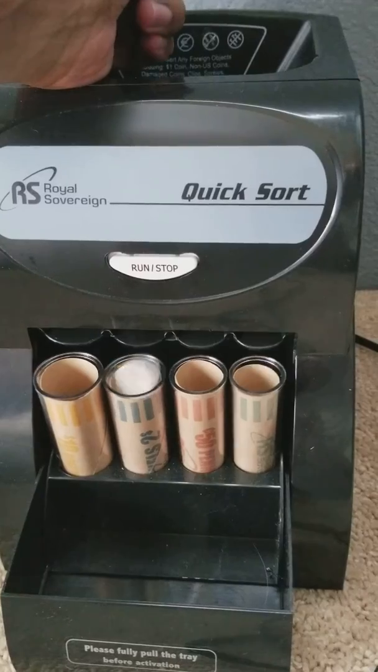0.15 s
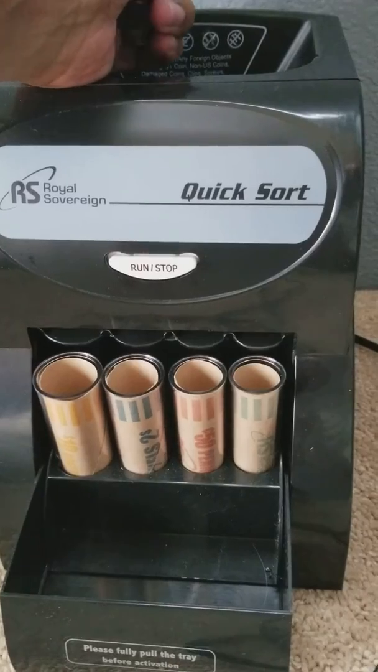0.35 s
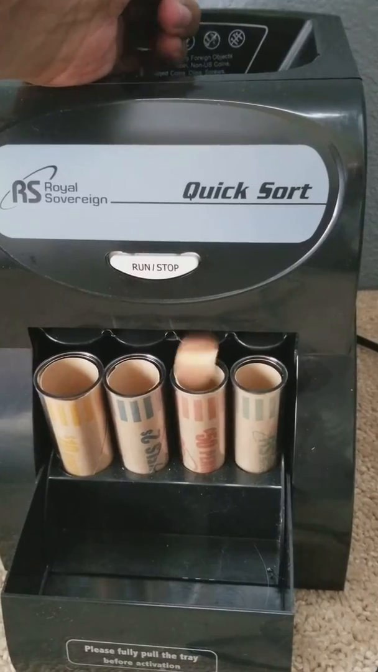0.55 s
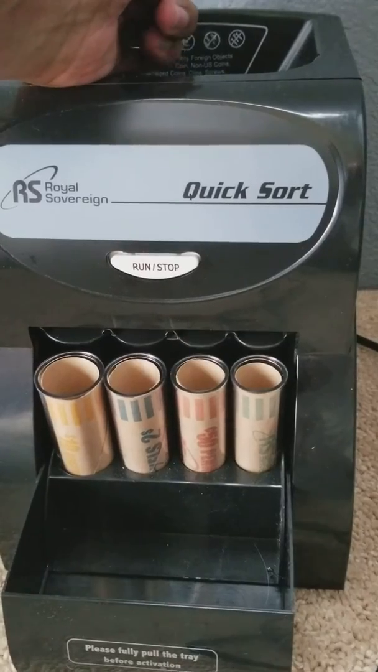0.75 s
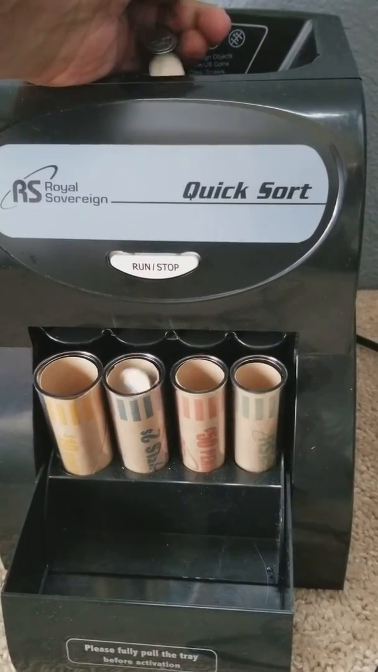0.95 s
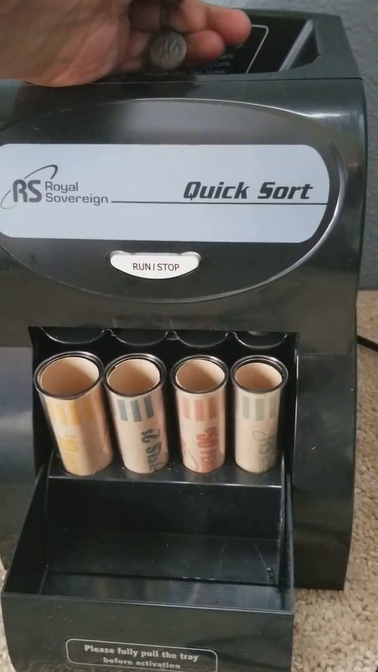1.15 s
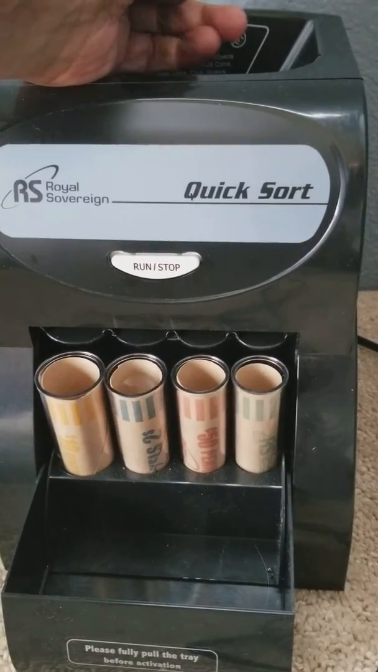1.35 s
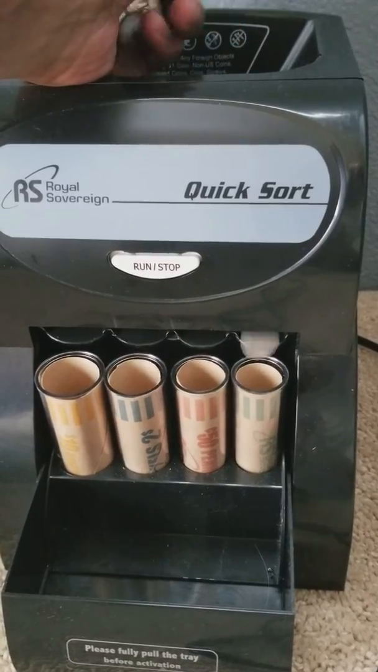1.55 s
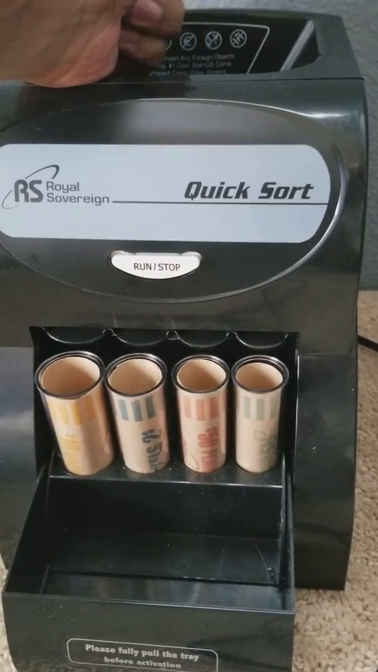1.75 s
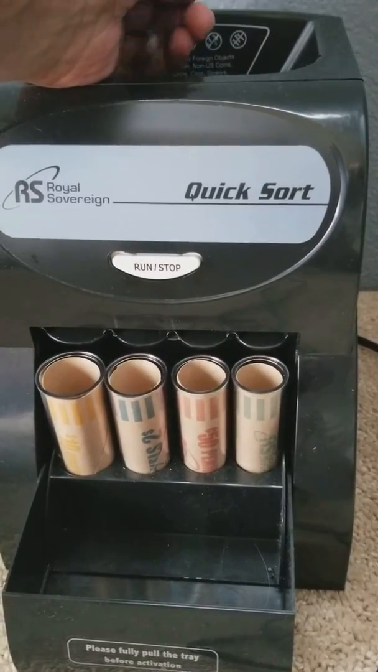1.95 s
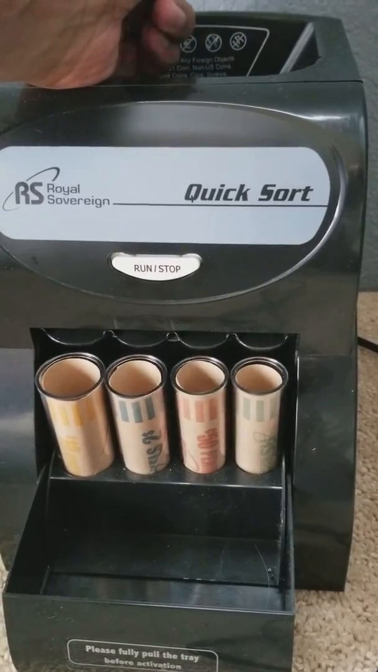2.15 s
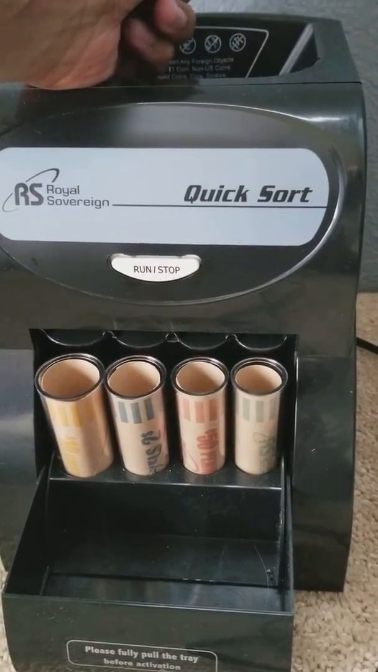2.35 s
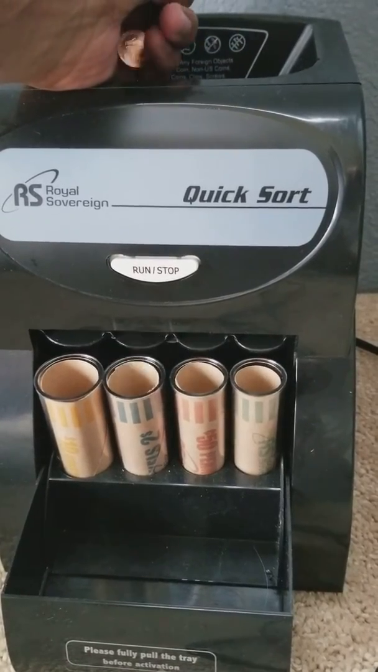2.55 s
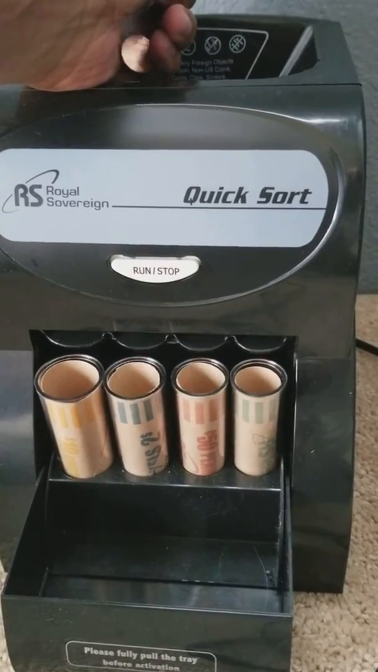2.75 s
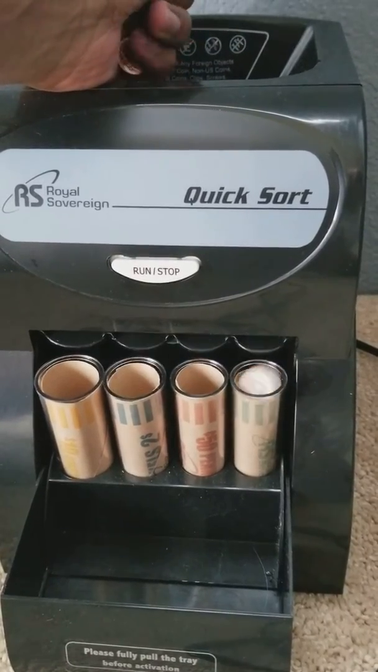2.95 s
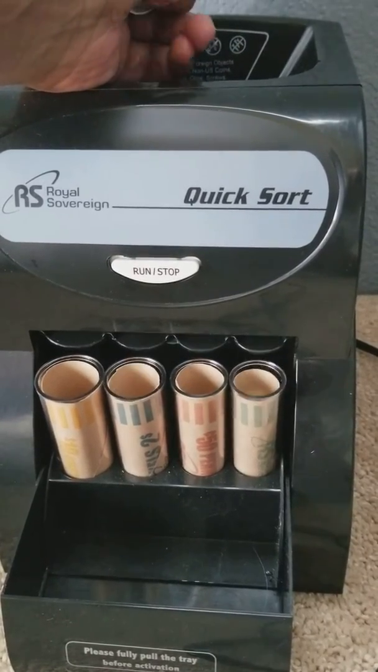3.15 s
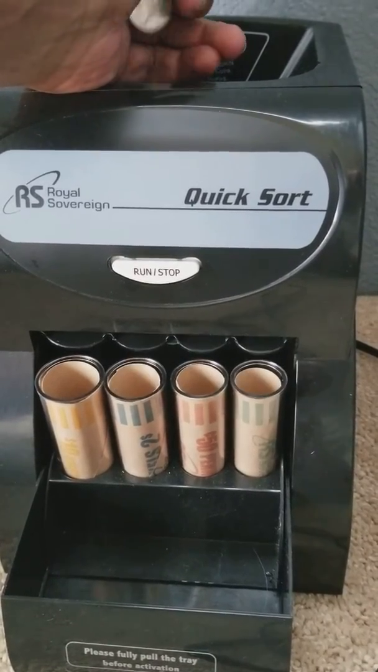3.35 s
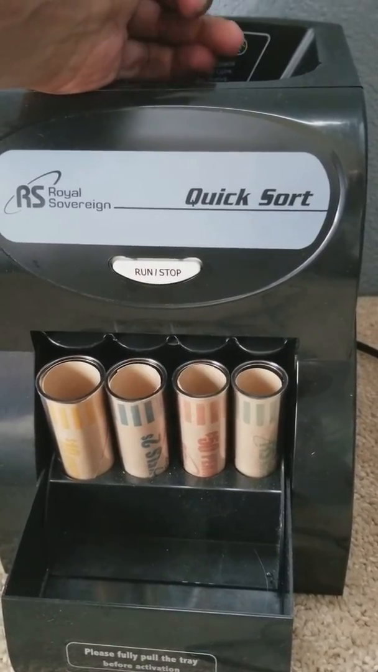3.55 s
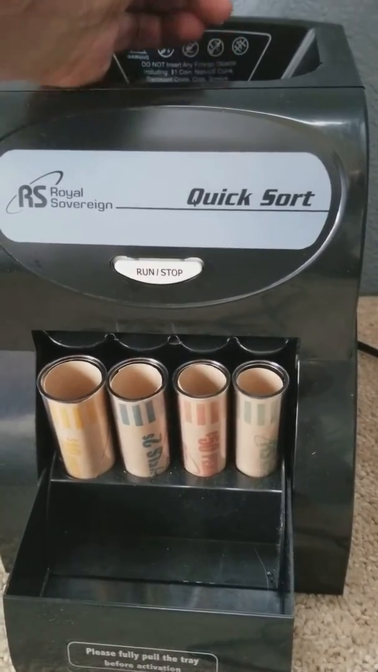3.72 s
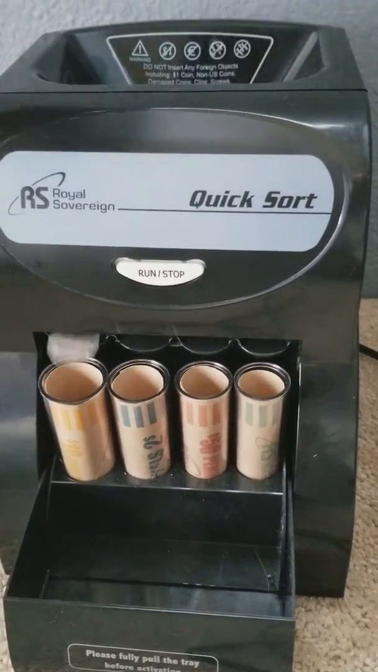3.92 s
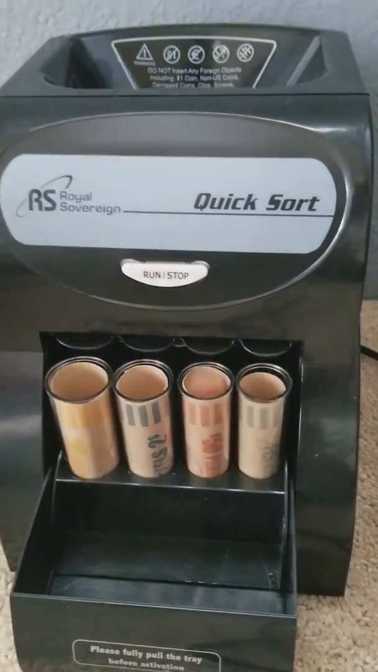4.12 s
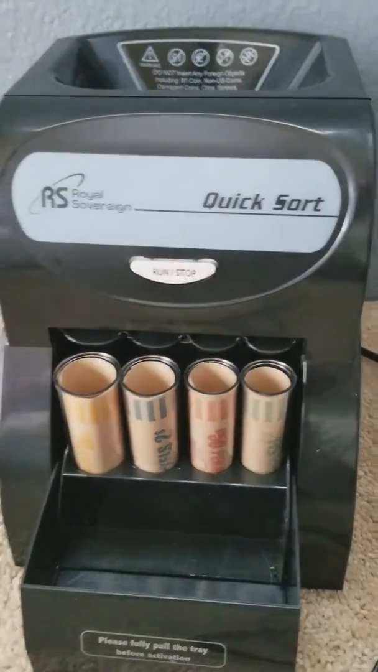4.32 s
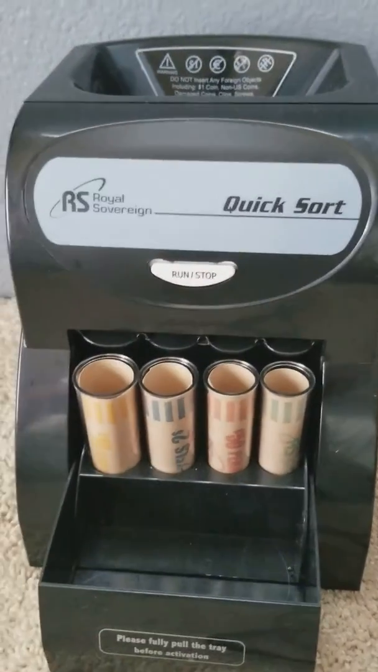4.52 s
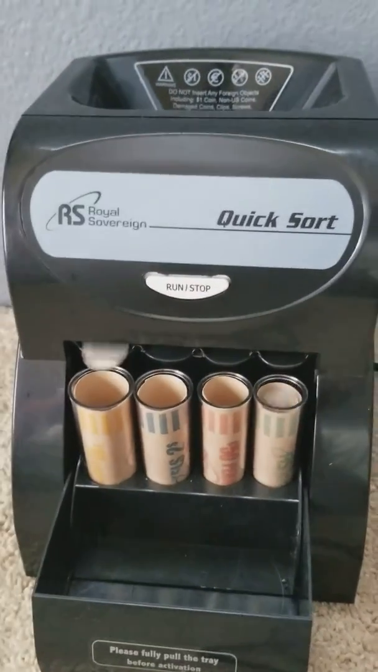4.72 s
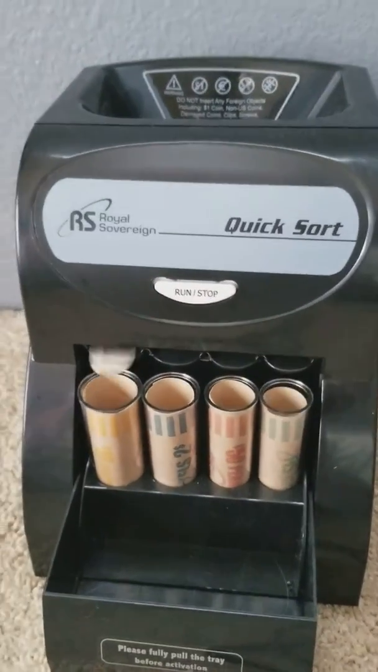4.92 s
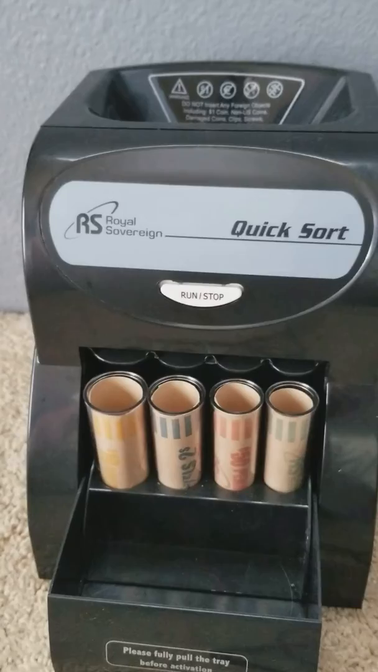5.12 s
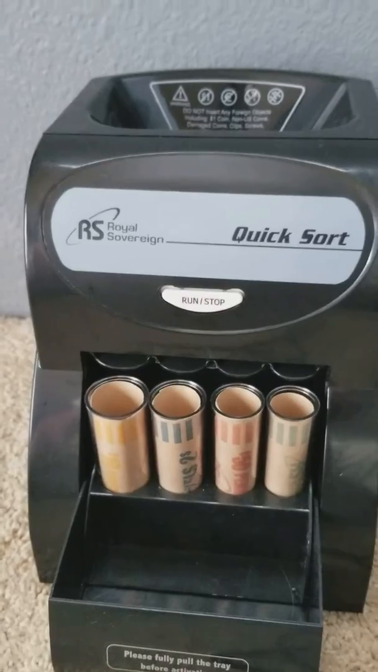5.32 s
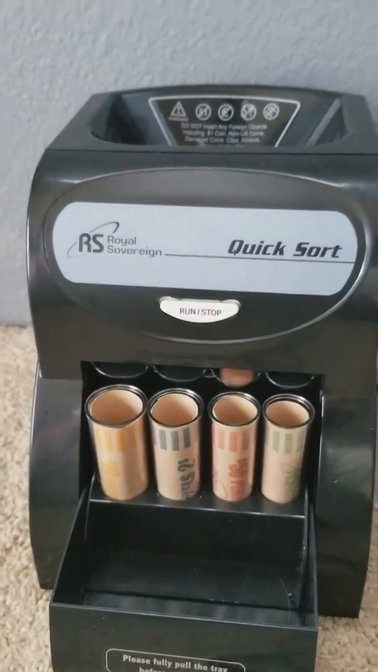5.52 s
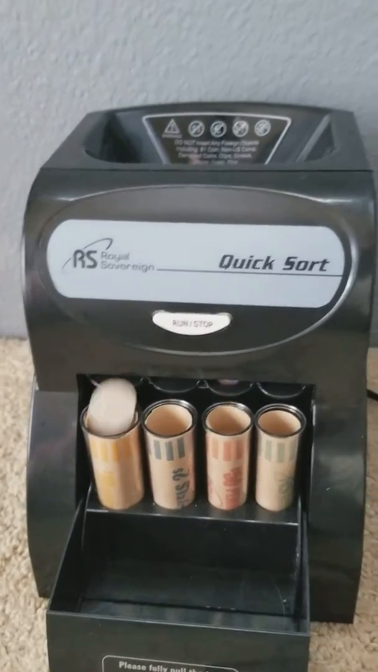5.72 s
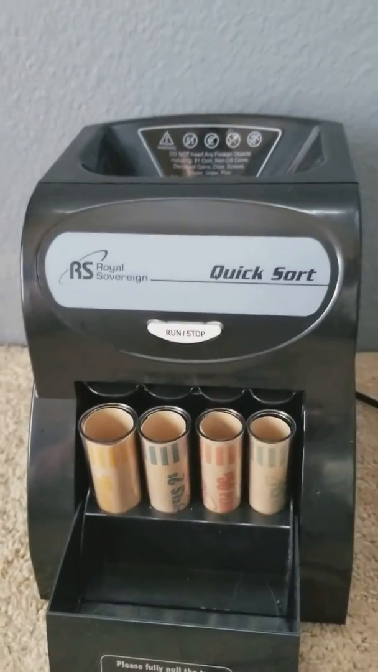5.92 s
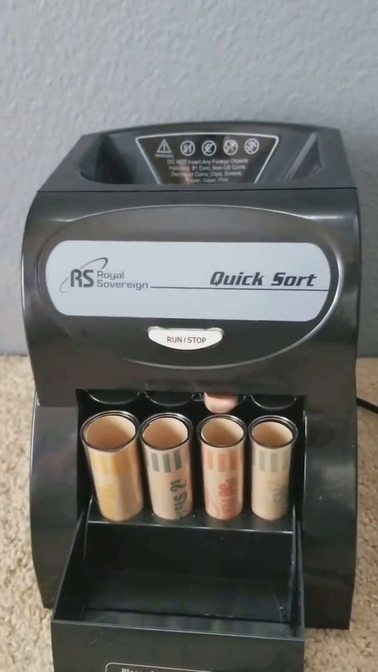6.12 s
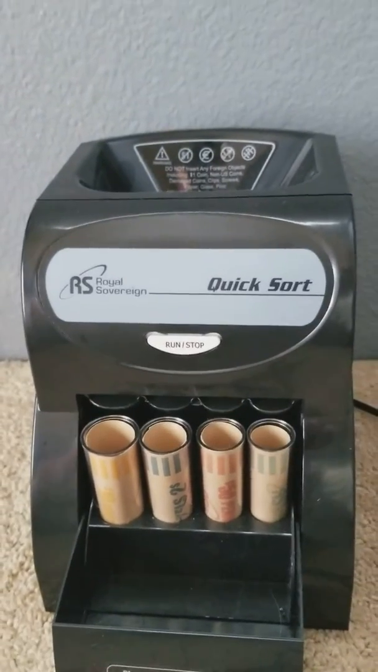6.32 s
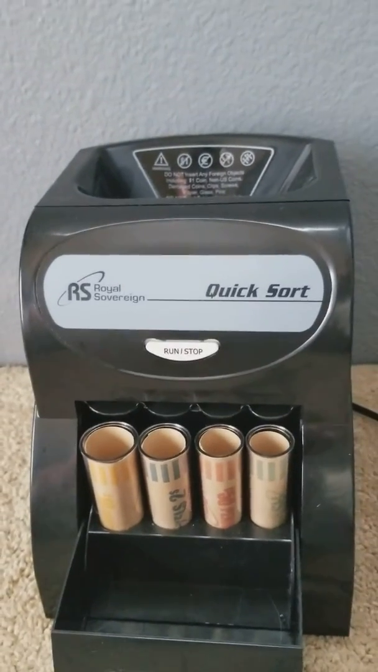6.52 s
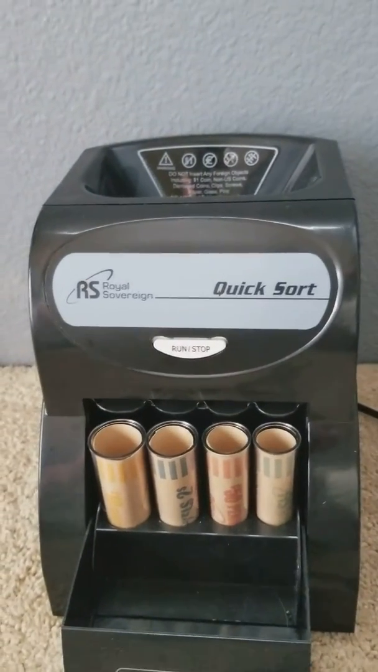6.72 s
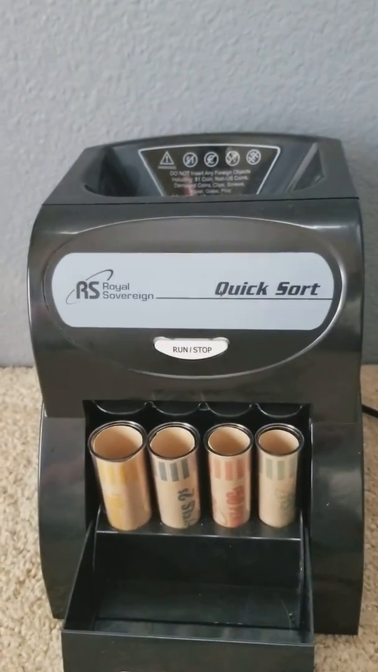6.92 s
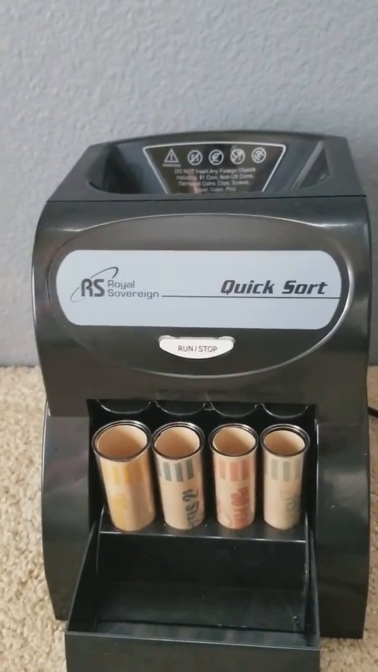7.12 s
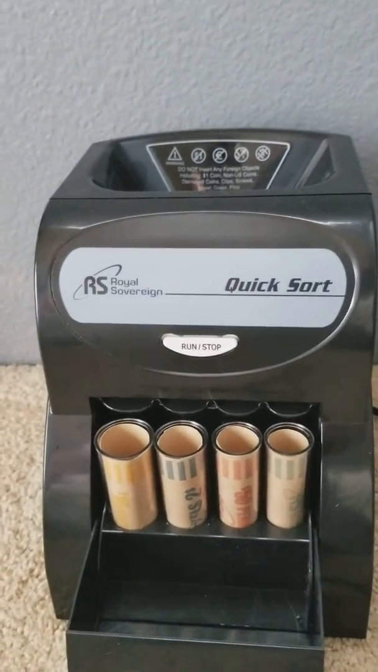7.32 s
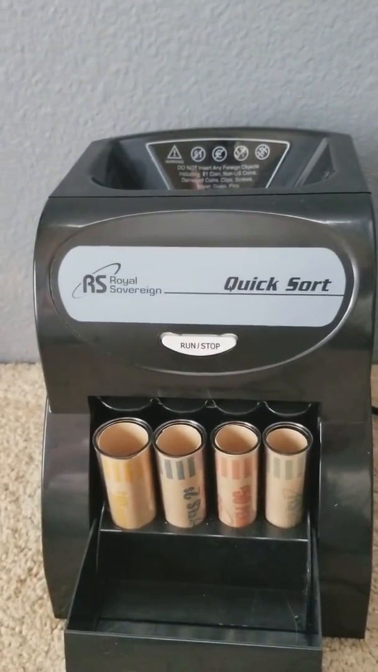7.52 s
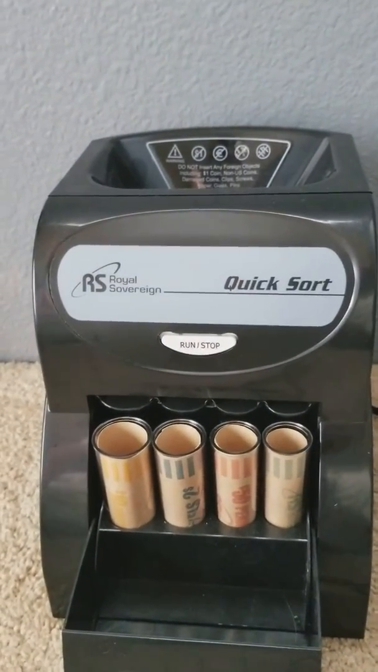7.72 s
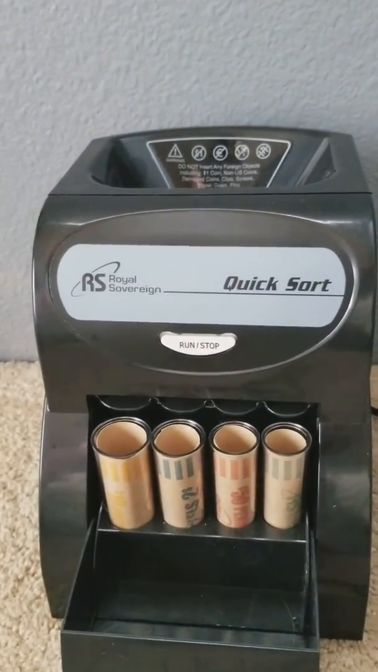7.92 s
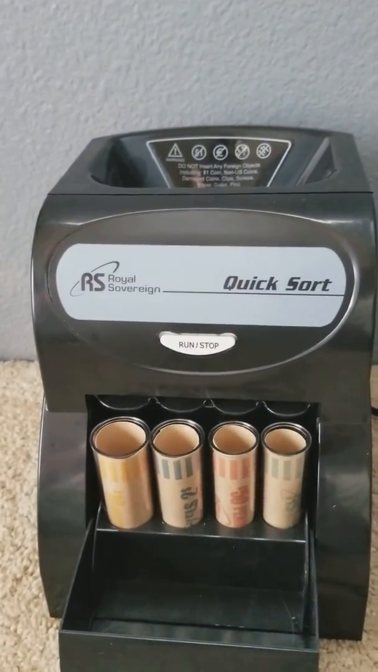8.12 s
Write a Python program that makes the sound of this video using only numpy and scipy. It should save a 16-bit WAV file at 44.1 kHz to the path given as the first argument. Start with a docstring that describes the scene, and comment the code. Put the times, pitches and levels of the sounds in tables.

```python
"""Electric coin sorter on a carpet.

Coins fall into the hopper, tumble on the turning disc and drop into paper tubes. Each contact rings
the metal and knocks the hollow plastic housing; coins in the air sing. A flap snaps once a turn.
Towards the end the coins run out, leaving the motor's hum and the rub of the bare disc."""
import sys
import numpy as np
from scipy import signal
from scipy.fft import rfft, irfft, next_fast_len
from scipy.io import wavfile
from scipy.ndimage import uniform_filter1d

SR = 44100
rng = np.random.default_rng(int(sys.argv[2]) if len(sys.argv) > 2 else 0)


def file_out(sig):
    """Save sig as 16-bit WAV at sys.argv[1]."""
    # one column per channel
    cols = np.atleast_2d(sig).T
    # limit, then scale
    lim = np.clip(cols, -1, 1)
    pcm = np.round(lim * 32767).astype(np.int16)
    wavfile.write(sys.argv[1], SR, pcm)


N = 364266
T = np.arange(N) / SR


def undb(db):
    """Decibels to gain."""
    return 10 ** (np.asarray(db) / 20)


def unit(x):
    """Scale to rms 1."""
    return x / np.sqrt(np.mean(x ** 2))


def curve(t_s, db):
    """Gain per sample from dB breakpoints."""
    return undb(np.interp(T, t_s, db))


def walk(rate_hz):
    """Smooth random drift, rms 1."""
    step = int(SR / rate_hz)
    held = np.repeat(rng.standard_normal(N // step + 1), step)
    return unit(uniform_filter1d(held, step)[:N])


def stereo_noise(lag_s, coherence):
    """White noise: a shared part, lagging on the right, plus independent parts."""
    noise = rng.standard_normal((3, N))
    shared = np.array([noise[0], np.roll(noise[0], round(lag_s * SR))])
    return np.sqrt(coherence) * shared + np.sqrt(1 - coherence) * noise[1:]


def colour(x, spectrum):
    """Filter by (f/Hz, level/dB) points; white noise keeps its rms."""
    hz, db = np.transpose(spectrum)
    size = next_fast_len(N)
    bins_hz = np.maximum(np.fft.rfftfreq(size, 1 / SR), 1)
    gain = unit(undb(np.interp(np.log(bins_hz), np.log(hz), db)))
    return irfft(rfft(x, size) * gain, size)[..., :N]


def ring(x, hz, width_hz, order=1):
    """One resonance; order 2 has steeper flanks."""
    if order == 1:
        peak = signal.iirpeak(hz, hz / width_hz, fs=SR)
        return signal.lfilter(*peak, x) * np.sqrt(SR / (np.pi * width_hz))
    band = signal.butter(order, [hz - width_hz / 2, hz + width_hz / 2], "band", fs=SR, output="sos")
    return signal.sosfilt(band, x) * np.sqrt(SR * np.sqrt(2) / (np.pi * width_hz))


def resonances(x, modes):
    """Modes of alternating polarity under one drive."""
    return sum((-1) ** k * undb(db) * ring(x, hz, width) for k, (hz, width, db, *_) in enumerate(modes))


def strikes(t_s, db, pan_db=0):
    """One stereo impulse per contact; pan is left minus right."""
    out = np.zeros((2, N))
    at = np.minimum((t_s * SR).astype(int), N - 1)
    np.add.at(out[0], at, undb(db + pan_db / 2))
    np.add.at(out[1], at, undb(db - pan_db / 2))
    return out


def envelope(hits, rise_s, t60_s):
    """Fast swell and exponential decay after each impulse."""
    up, down = np.exp(-1 / (rise_s * SR)), undb(-60 / (t60_s * SR))
    return signal.lfilter([1 - up], np.convolve([1, -up], [1, -down]), hits)


def rattle(modes, noise, t_s, db, scrape, scatter_db, t60_s, pan_db=0, order=1):
    """Contacts and wavering scrape drive each mode with noise; db is one row, or a row per mode."""
    move_s = 3.73  # the listener moves from above the hopper to face the tubes
    drive_db = db + scatter_db * rng.standard_normal((len(modes), len(t_s)))
    out = 0
    for k, (hz, width_hz, *view_db) in enumerate(modes):
        drive = envelope(strikes(t_s, drive_db[k], pan_db), 0.00044, t60_s)
        drive += scrape * undb(6.5 * walk(35))
        gain = undb(np.where(T > move_s, view_db[-1], view_db[0]))
        out += (-1) ** k * gain * ring(drive * noise, hz, width_hz, order)
    return out


# whirr spectrum: f/Hz, relative level/dB
WHIRR_SPECTRUM = [(15, -57.5), (28, -16.5), (113, -15.5), (175, -20), (235, -5), (438, -21),
                  (639, -13.5), (984, -22.5), (4120, -32), (11800, -22.5), (15900, -27.5)]
# hum: t/s, low tone level/dB, high tone level/dB
HUM_LEVELS = [(6.3, -84.5, -70.5), (6.85, -73.5, -70), (7.0, -64.5, -65), (7.14, -63, -64.5),
              (7.22, -68, -64), (7.42, -68, -63.5), (7.5, -65, -61.5), (7.72, -64, -66), (7.8, -71.5, -66)]


def motor():
    """Faint whirr and two wavering mains hum tones that grow louder near the end."""
    whirr = undb(-61.5 + 4.1 * walk(6.5)) * colour(stereo_noise(0, 0.32), WHIRR_SPECTRUM)
    t_s, low_db, high_db = np.transpose(HUM_LEVELS)
    hum = 0
    for hz, db in (120, low_db), (239.5, high_db):
        tone = np.sin(2 * np.pi * hz * T + 2.1 * walk(20))
        hum += curve(t_s, db + 2.5) * undb(4 * walk(12)) * tone
    return whirr + hum


# deep bumps: t/s, level/dB
BUMPS = [(.25, -48), (.6, -52), (2.06, -59), (3.132, -46), (6.784, -46), (6.801, -51), (7.882, -54)]


def bumps():
    """Deep one-sided pulses, DC blocked."""
    t_s, db = np.transpose(BUMPS)
    pulses = envelope(strikes(t_s, db + 6.5), 0.0012, 0.02)
    return signal.lfilter([1, -1], [1, -0.995], pulses)


# disc rubs: t/s, level/dB
RUBS = [(6.87, -63), (6.95, -74), (7.043, -48.5), (7.126, -50), (7.231, -52), (7.323, -47.5), (7.438, -53),
        (7.51, -49), (7.615, -54), (7.665, -56), (7.84, -59), (7.891, -50.5), (8.021, -55), (8.116, -57),
        (8.21, -57)]


def disc_rub(half_width_s=0.025):
    """The bare disc scuffs the housing, driving its hollow and low modes."""
    swells = sum(undb(db) * np.exp(-((T - t_s) / half_width_s) ** 2) for t_s, db in RUBS)
    return swells * unit(resonances(stereo_noise(0.00026, 0.85), HOLLOW_MODES + HOUSING_MODES[:8]))


# snaps, early or late with the load: t/s, level/dB
SNAPS = [(0.2435, -5), (0.6253, -7.5), (1.004, -5.5), (1.3788, -4), (1.768, -7), (2.154, -7), (2.536, -6),
         (2.9156, -7), (3.2978, -6.5), (3.671, -7), (4.0593, -8.5), (4.444, -8.5), (4.8263, -7),
         (5.2069, -9.5), (5.587, -7.5), (5.9603, -7), (6.349, -5), (6.7366, -6), (7.1165, -5), (7.498, -6),
         (7.878, -5), (8.2504, -3)]
# crack spectrum: f/Hz, relative level/dB
CRACK_SPECTRUM = [(590, -45.5), (1000, -18.5), (1960, -14.5), (2350, -16.5), (2950, -20), (3450, -12),
                  (5740, -11), (7410, -3), (10100, -4), (11100, 2.5), (15000, -6.5), (15900, 8)]
# flap modes: f/Hz, width/Hz, level/dB
FLAP_MODES = [(1510, 150, -12.5), (2020, 90, -5.5), (3420, 110, 1), (4400, 120, -2.5), (5140, 86, 1),
              (6390, 150, -1), (7270, 180, 2), (8400, 200, 3)]


def flap():
    """Once a turn the flap cracks, rings with a fading buzz and knocks the housing."""
    t_s, db = np.transpose(SNAPS)
    hits = strikes(t_s, db)
    burst = uniform_filter1d(hits, 150, origin=74) * 150  # each hit held 3.4 ms
    crack = envelope(burst, 0.00053, 0.023) * undb(-39 + 0.51 * walk(820))
    tail = envelope(hits, 0.0078, 0.0095) * undb(-8 + 3 * walk(150))
    snap = colour((crack + tail) * stereo_noise(-0.0001, 0.078), CRACK_SPECTRUM)
    blow = strikes(t_s + 0.002, db - 15.5)
    buzz = envelope(hits, 0.003, 0.061) * undb(-29.5 + 4.8 * walk(90)) * stereo_noise(0.0001, 0.12)
    knock = envelope(strikes(t_s, db=-23), 0.0043, 0.014) * stereo_noise(0.0003, 0.98)
    return snap + resonances(blow + buzz, FLAP_MODES) + resonances(knock, HOUSING_MODES[5:])


# airborne coin rings: t/s, f/Hz, level/dB
RINGS = [(0.03, 14000, -38), (0.27, 14000, -33), (0.348, 12403, -35), (0.6, 11570, -35), (0.94, 13824, -37),
         (1.19, 14200, -35), (1.42, 14200, -37), (1.685, 13307, -35), (1.715, 12800, -35),
         (2.32, 15331, -33), (4.31, 13350, -39), (4.9, 15546, -31), (4.905, 14944, -36), (4.93, 12100, -35),
         (4.945, 12750, -36), (5.88, 12050, -35), (5.9, 12750, -37), (6.16, 12750, -41),
         (6.255, 12700, -36), (6.745, 12900, -37), (0.61, 15331, -28), (0.639, 13824, -25),
         (0.7, 12833, -36), (0.615, 13900, -33), (1.555, 15000, -34), (1.59, 14960, -35),
         (1.82, 12600, -37), (2.26, 12700, -37), (6.685, 13350, -40), (6.69, 12200, -40),
         (6.706, 12250, -36), (6.764, 11800, -37), (6.765, 12800, -37), (6.783, 14500, -37),
         (6.8, 13450, -38), (0.734, 12833, -37), (1.045, 13996, -33), (1.3, 14513, -31),
         (1.327, 12360, -34), (1.5, 14944, -29), (1.541, 12489, -31), (1.66, 12661, -35),
         (1.803, 13307, -36), (2.003, 15546, -34), (2.014, 14944, -34), (2.072, 14900, -27),
         (2.078, 15546, -27), (2.16, 15546, -32), (2.168, 14944, -31), (2.189, 13867, -36),
         (2.241, 12532, -35), (2.551, 15331, -27), (2.752, 15503, -34), (2.755, 13824, -38),
         (3.045, 12316, -35), (3.132, 14513, -32), (3.585, 12532, -34), (4.11, 15540, -23),
         (4.14, 15420, -27), (4.165, 15650, -30), (5.076, 15503, -26), (5.088, 14944, -30),
         (5.666, 15417, -34), (5.838, 15417, -30), (6.766, 14470, -37), (6.797, 12790, -36)]


def singing_coins():
    """Two close modes of a spinning coin beat, flutter and fade out."""
    out = np.zeros((2, N))
    flutter = undb(3 * np.array([walk(110), walk(110)]))
    for (t_s, hz, db), (split, *phases) in zip(RINGS, rng.random((len(RINGS), 3))):
        length_s = 0.0058 * (db + 48)  # a louder ring is heard longer
        start, t = int(t_s * SR), T[:int(length_s * SR)]
        attack = 1 - np.exp(-t / 0.003)
        decay = undb(-16 * t / length_s)
        release = np.clip((length_s - t) / 0.01, 0, 1)
        beat_hz = 25 + 60 * split
        for side, (phase, side_db) in enumerate(zip(phases, (1.335, 0.39))):
            tone = np.sin(2 * np.pi * (hz * t + phase))
            tone += 0.6 * np.sin(2 * np.pi * ((hz + beat_hz) * t - phase))
            out[side, start:start + len(t)] += undb(db + side_db) * attack * decay * release * tone
    return out * flutter


# flat landings: t/s, level/dB
LANDINGS = [(0.6, -15), (1.04, -23), (1.312, -25), (1.6, -19), (2.064, -24.5), (2.9267, -13), (2.9965, -23),
            (3.09, -23), (3.2252, -13), (3.522, -8.5), (4.11, -21.5), (4.6957, -34)]
# tube modes: f/Hz, width/Hz, level/dB
TUBE_MODES = [(975, 130, 0), (1800, 150, -8), (3110, 170, -1)]


def tube_landings():
    """A coin landing flat in a tube gives a hollow knock."""
    t_s, db = np.transpose(LANDINGS)
    noise = stereo_noise(0.00033, 0.23)
    return rattle(TUBE_MODES, noise, t_s, db, scrape=0, scatter_db=1.6, t60_s=0.014, order=2)


# housing cavity modes: f/Hz, width/Hz, level/dB
HOLLOW_MODES = [(242.2, 59, 0.5), (275.2, 62, 2.5), (338, 46, -3.5), (521.6, 27, -6)]


def hollow_thud(t_s, db, rumble):
    """Blows and sliding coins drive the air in the housing."""
    drive = envelope(strikes(t_s, db + 4), 0.0069, 0.011) + rumble * undb(1.2 * walk(23))
    return resonances(drive * stereo_noise(0.00006, 0.99), HOLLOW_MODES)


# housing modes: f/Hz, width/Hz, level above hopper/dB, level facing tubes/dB
HOUSING_MODES = [(685.5, 136, -5.5, 1), (837, 151, 0, 1), (932, 350, -0.5, 2.5), (1166, 160, -3.5, -3.5),
                 (1430, 210, -1.5, 6.5), (1650, 130, -8, -4), (1786, 110, -11.5, -16), (2044, 344, -2, -2),
                 (2369, 86, -12, -15.5), (2596, 230, -6, -6), (2890, 110, -8.5, -19.5),
                 (3066, 130, -6.5, -5), (3325, 320, -5, -6.5), (3780, 340, -3, -2.5), (4115, 150, -6, -5.5),
                 (4350, 1300, -6, -5)]


def housing_knock(t_s, upper_db, lower_db, scrape):
    """Coins knock and scrape the plastic; its low modes are driven longest."""
    low = rattle(HOUSING_MODES[:3], stereo_noise(0.00012, 0.85), t_s, lower_db - 10,
                 undb(-3.5) * scrape, scatter_db=1.1, t60_s=0.019, order=2)
    middle = rattle(HOUSING_MODES[3:5], stereo_noise(0.00032, 0.81), t_s, lower_db - 8.5,
                    undb(-2.5) * scrape, scatter_db=2.1, t60_s=0.014, order=2)
    high = rattle(HOUSING_MODES[5:], stereo_noise(0.00039, 0.68), t_s, upper_db - 8,
                  scrape, scatter_db=3.5, t60_s=0.013, order=2)
    return low + middle + high


# broad contact resonances: f/Hz, width/Hz, level/dB
CLINK_BANDS = [(4900, 900, -4.5), (6000, 1700, -17), (7500, 4040, 2.5), (9400, 2800, -1),
               (11100, 2330, -1.5), (13300, 2500, -2.5), (15700, 870, -7)]
# modes of the four coin sizes: f/Hz
COIN_MODES_HZ = 11570, 12400, 12800, 13300, 13820, 14500, 14930, 15330, 15510


def coin_clink(t_s, db, centre_hz, scrape):
    """A contact drives the bands near its centre most and briefly rings the narrow coin modes."""
    pan_db = 1 + 3.5 * (rng.random(len(t_s)) - 0.5)
    band_db = [db + 0.3 - 10 * (np.log(hz / centre_hz) / 0.45) ** 2 for hz, *_ in CLINK_BANDS]
    clink = rattle(CLINK_BANDS, stereo_noise(0.0002, 0.31), t_s, band_db,
                   undb(-11.5) * scrape, scatter_db=2.8, t60_s=0.026, pan_db=pan_db)
    modes = [(hz, 40, 0) for hz in COIN_MODES_HZ]
    clink += rattle(modes, stereo_noise(0.0002, 0.5), t_s, db - 17,
                    undb(-17) * scrape, scatter_db=5, t60_s=0.012, pan_db=pan_db)
    # a coin is too small to radiate below its lowest modes
    return signal.sosfilt(signal.butter(2, 4000, "high", fs=SR, output="sos"), clink)


def bounces(blows, gap_s=0.008, loss_db=6):
    """Each falling coin lands twice more, weaker each time."""
    t_s, clink_db, centre_hz, upper_db, lower_db = blows
    late, weak = rng.random((len(t_s), 2, 2)).T
    contacts = []
    for k in range(2):
        delay_s = gap_s * (k + late[k] + 0.5)
        drop_db = loss_db * (k + weak[k] + 0.5)
        contacts.append((t_s + delay_s, clink_db - 2 * drop_db, centre_hz,
                         upper_db - drop_db, lower_db - drop_db))
    return np.hstack(contacts)


def tumble(slide_s, slide_db, rub_db, count=1050):
    """Random small contacts on the disc, mostly weak."""
    when, size, pitch, tilt = rng.random((count, 4)).T
    t_s = when * slide_s[-1]
    size_db = np.minimum(-3.5 * np.log(1 - size), 8.5)
    clink_db = np.interp(t_s, slide_s, slide_db) + size_db - 3
    knock_db = np.interp(t_s, slide_s, rub_db) + 1.47 * size_db
    return t_s, clink_db, 6000 * 3.2 ** pitch, knock_db - 1.5 - 9 * tilt, knock_db - 15 + 9 * tilt


# coin blows: t/s, clink/dB, clink centre/Hz, upper housing modes/dB, lower housing modes/dB, thud/dB
BLOWS = [(0.0309, -19.5, 9800, -15, -43, -49), (0.052, -32, 9600, -23, -23, -36),
         (0.185, -15.5, 12500, -55, -21, -38), (0.269, -12.5, 12700, -38, -16.5, -22),
         (0.35, -15, 13700, -59, -22, -56), (0.464, -18, 7500, -23, -28.5, -64),
         (0.597, -17, 8100, -11, -14.5, -24), (0.6136, -15, 9500, -11, -17.5, -34),
         (0.667, -18, 10100, -16.5, -38, -40), (0.762, -24, 10200, -18.5, -31, -31),
         (0.778, -28, 10100, -15.5, -39, -28), (0.798, -16.5, 10300, -18, -50, -57),
         (1.0414, -14, 10100, -12.5, -22, -27), (1.046, -15.5, 9200, -17, -50, -43),
         (1.184, -21.5, 8540, -15, -31, -57), (1.2652, -30, 8200, -28, -19.5, -23),
         (1.2949, -20, 9300, -7.5, -11.5, -19), (1.311, -18, 9900, -11.5, -19, -45),
         (1.329, -20, 11700, -13.5, -21, -30), (1.4174, -13, 9700, -14, -13, -25),
         (1.5341, -21, 14100, -56, -55, -61), (1.562, -21, 10600, -31, -55, -55),
         (1.5803, -19.5, 8800, -15, -48, -62), (1.598, -21, 8600, -18, -34, -24),
         (1.609, -19, 9200, -17, -28, -46), (1.7087, -30, 9300, -13.5, -20, -48),
         (1.9436, -17, 10400, -19, -49, -53), (2.056, -20, 8100, -7, -8.5, -19),
         (2.065, -16, 8140, -8, -17, -49), (2.08, -42, 13300, -31, -23, -37),
         (2.089, -13, 11100, -10.5, -20, -39), (2.135, -39, 11000, -18, -17, -44),
         (2.19, -16.5, 13000, -45, -39, -49), (2.241, -18, 11900, -60, -46, -41),
         (2.32, -18.5, 9800, -19, -30, -38), (2.432, -23, 9300, -24.5, -24, -29),
         (2.515, -16, 9500, -16, -25, -35), (2.554, -21, 12400, -49, -20.5, -35),
         (2.64, -20.5, 9700, -24, -25.5, -59), (2.6845, -24.5, 10000, -26, -25.5, -30.5),
         (2.757, -18, 12300, -58, -36, -58), (2.7942, -16.5, 12300, -38, -19.5, -62),
         (2.9265, -37, 9200, -14.5, -13.5, -24.5), (2.998, -21.5, 7000, -13, -21, -32),
         (3.0717, -23.5, 10700, -20, -21.5, -31), (3.092, -24.5, 8200, -16.5, -30, -35),
         (3.1247, -16, 12800, -17.5, -25, -60), (3.2234, -18.5, 10900, -18.5, -20, -30),
         (3.346, -50, 9600, -19.5, -28, -63), (3.369, -26.5, 9200, -20.5, -26, -35),
         (3.409, -23.5, 8400, -22.5, -24, -22.5), (3.4233, -22, 9700, -35, -39, -48),
         (3.524, -22.5, 8400, -8.5, -27, -23.5), (3.5618, -45, 11000, -33, -23, -38),
         (3.609, -38, 11000, -32, -50, -54), (3.5915, -22, 12300, -21.5, -21.5, -33),
         (3.6281, -28, 10200, -22, -26, -55), (3.912, -18.5, 12900, -26, -42, -56),
         (3.9342, -40, 7960, -16, -31, -37), (3.9437, -19.5, 11700, -37, -27, -37),
         (3.9852, -23, 9000, -20, -31, -22.5), (4.1082, -5.5, 15300, -16.5, -20, -33),
         (4.165, -21, 14100, -31, -27, -38), (4.193, -19.5, 13100, -55, -41, -47),
         (4.2209, -16, 13700, -32, -31.5, -58), (4.379, -21, 12300, -24.5, -37, -34),
         (4.6963, -29, 8800, -16.5, -23, -35), (4.708, -16, 10600, -19, -28, -26.5),
         (4.773, -19, 12800, -29, -43, -41), (4.892, -13.5, 12300, -17, -19.5, -36),
         (5.0749, -19, 14500, -25.5, -23, -46), (5.088, -11.5, 13300, -32, -24, -34),
         (5.128, -23.5, 12900, -45, -41, -40), (5.426, -23, 9400, -25, -50, -67),
         (5.48, -29, 9100, -25, -66, -69), (5.558, -28, 10600, -28, -34, -64),
         (5.6431, -27, 11940, -26, -20.5, -48), (5.658, -24, 10400, -20, -30, -33),
         (5.673, -19, 11400, -16.5, -31, -56), (5.694, -22.5, 10600, -25, -31, -28),
         (5.709, -26, 10100, -25, -26.5, -29), (5.7658, -24, 10100, -29, -34, -42),
         (5.8368, -8.5, 13300, -21, -19, -32), (5.882, -15.5, 12500, -36, -34, -65),
         (6.006, -28, 9300, -30, -70, -71), (6.0762, -24.5, 8000, -20, -25, -26.5),
         (6.0895, -24.5, 9100, -24, -33, -25), (6.2513, -22, 11400, -32.5, -24.5, -41),
         (6.275, -20.5, 12300, -69, -53, -36), (6.4847, -37.5, 13000, -50, -51.5, -43),
         (6.589, -31.5, 12200, -57, -69.5, -76.5), (6.646, -37.5, 12800, -52, -56.5, -74),
         (6.675, -34, 12950, -67.5, -55, -59), (6.692, -30, 13200, -64.5, -57.5, -65),
         (6.811, -43, 13100, -58, -66, -66), (6.707, -25, 12900, -61, -64, -64.5),
         (6.733, -40, 11200, -34, -57, -39.5), (6.774, -40, 4520, -42, -62, -58),
         (6.789, -44, 4500, -45, -64, -60), (6.748, -26, 4400, -32, -53, -55),
         (6.767, -16, 13300, -44, -48, -40), (6.784, -24, 14000, -48, -43, -33.5),
         (6.797, -17.5, 13700, -41, -54, -60), (6.96, -27, 12900, -63, -48.5, -72),
         (7.1738, -33, 13200, -45, -57, -65), (7.218, -36, 10800, -46.5, -64.5, -63),
         (8.028, -45, 11500, -62, -83, -77), (8.055, -37, 12400, -51, -71.5, -80.5),
         (8.109, -34, 12940, -65, -71, -75), (8.152, -42, 12600, -79, -78, -73),
         (8.221, -37.5, 13100, -66, -51, -57), (0.117, -24.5, 10270, -30, -25, -39),
         (0.321, -27, 10900, -26, -26, -40), (0.548, -25, 10100, -25.5, -35, -55),
         (0.577, -25, 9600, -28, -26, -45), (0.701, -18.5, 11000, -18.5, -24, -46),
         (0.85, -28, 11700, -30, -44, -39), (0.9, -27, 9500, -25.5, -27, -29),
         (0.978, -34, 12500, -50, -27, -34), (1.236, -25.5, 10500, -25, -28, -53),
         (1.501, -27, 13500, -43, -31, -43), (1.588, -25, 9500, -18, -25, -39),
         (1.6395, -21, 9000, -11, -14, -45), (1.662, -36, 9500, -15, -38, -36),
         (1.9827, -17.5, 9800, -26, -48, -53), (2.214, -18, 11100, -16.5, -26, -31),
         (2.352, -32, 12500, -29, -31, -39), (2.404, -25, 10500, -22, -23.5, -36),
         (2.616, -28, 10300, -34, -47, -50), (2.7295, -26, 11200, -59, -47, -43),
         (2.903, -18, 10800, -19, -34, -42), (3.05, -29, 11500, -37, -25, -31),
         (3.706, -29, 10500, -31, -50, -57), (3.7296, -27.5, 10500, -29, -64, -60),
         (3.793, -24, 11900, -25, -54, -61), (3.8385, -35, 11000, -45, -60, -64),
         (3.901, -27, 10000, -39, -49, -56), (4.124, -23, 13900, -53, -53, -48),
         (4.141, -17, 13400, -41, -33, -42), (4.2935, -38, 11300, -35, -52, -64),
         (4.515, -38, 10500, -29, -58, -59), (4.553, -32, 10100, -26, -38, -46),
         (4.601, -30, 10200, -28, -33.5, -47), (4.6798, -31, 11100, -26, -45, -44),
         (4.7578, -23, 11600, -25, -27.5, -40), (5.393, -37, 11000, -40, -33.5, -56),
         (5.623, -32, 10500, -29, -56, -61), (5.746, -24, 9900, -36, -42, -50),
         (5.902, -18, 12800, -47, -35, -53), (5.918, -23.5, 12600, -51, -42, -57),
         (6.022, -34, 10000, -27, -43, -60), (6.141, -32, 11500, -31, -36.5, -55),
         (6.1655, -36, 11500, -56, -52, -54), (6.566, -40.5, 12330, -65, -77, -71),
         (6.8885, -40, 11700, -57, -54, -70)]
# sliding change, swelling after each handful: t/s, clink/dB, housing knock/dB
SLIDING = [(0.0, -32.5, -28), (0.559, -47.5, -41), (0.62, -27, -26.5), (0.8, -39.5, -32.5),
           (1.48, -38, -35), (1.62, -29.5, -27.5), (1.85, -34, -28), (2.04, -40.5, -35), (2.12, -30, -29),
           (2.4, -42, -37.5), (3.3, -44.5, -39), (4.0, -44, -41), (4.3, -50, -45.5), (4.55, -43.5, -39.5),
           (4.871, -54, -43.5), (4.901, -26, -33), (5.07, -77, -52), (5.35, -60.5, -49), (5.7, -40.5, -40),
           (5.82, -66, -54.5), (5.86, -69, -48.5), (6.2, -54.5, -57), (6.6, -73, -87), (6.73, -55, -72.5),
           (6.755, -58, -56), (6.815, -50, -83), (6.85, -62, -82), (7.051, -76, -75)]


def coins():
    """Falling, tumbling and sliding coins drive the metal, the housing and its hollow."""
    *blows, thud_db = np.transpose(BLOWS)
    slide_s, slide_db, rub_db = np.transpose(SLIDING)
    small = tumble(slide_s, slide_db, rub_db)
    t_s, clink_db, centre_hz, upper_db, lower_db = np.hstack([blows, bounces(blows), small])
    loaded = T < slide_s[-1]
    clink = coin_clink(t_s, clink_db, centre_hz, scrape=loaded * curve(slide_s, slide_db))
    knock = housing_knock(t_s, upper_db, lower_db, scrape=loaded * curve(slide_s, rub_db - 17))
    thud = hollow_thud(blows[0], thud_db, rumble=loaded * curve(slide_s, 0.64 * rub_db - 28.5))
    return clink + knock + thud


def room(x, t60_s=0.24, level_db=-11.5):
    """Walls return a short, dull stereo tail."""
    t = T[:SR // 2]
    tail = rng.standard_normal((2, len(t))) * undb(-60 * t / t60_s) * (t > 0.004)
    tail = signal.lfilter([1], [1, -0.4], tail)
    tail /= np.sqrt(np.sum(tail ** 2, axis=1, keepdims=True))
    return undb(level_db) * signal.oaconvolve(x, tail, axes=1)[:, :N]


def scene():
    """Coins and flap in the room, over dry motor, bumps and disc rub."""
    sorter = coins() + tube_landings() + singing_coins() + flap()
    return motor() + bumps() + disc_rub() + sorter + room(sorter)


def record(dry):
    """Steep low-pass, 60 dB down at 16030 Hz."""
    return signal.sosfilt(signal.cheby2(24, 60, 16030, fs=SR, output="sos"), dry)


dry = scene()
out = record(dry)
file_out(out)
```